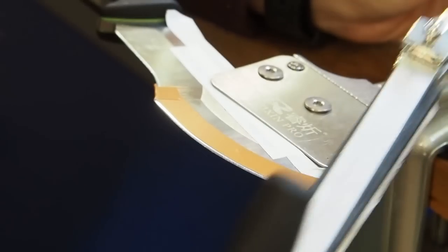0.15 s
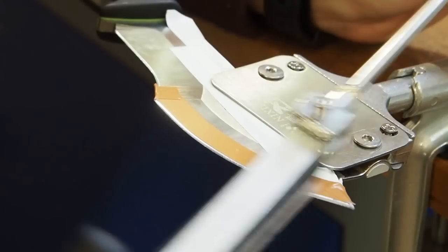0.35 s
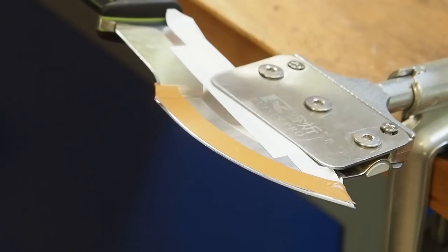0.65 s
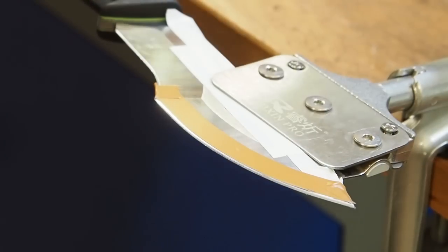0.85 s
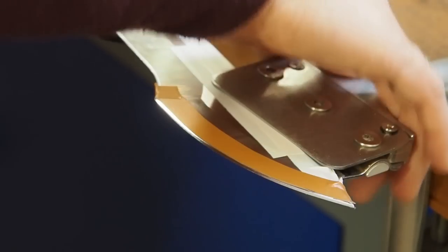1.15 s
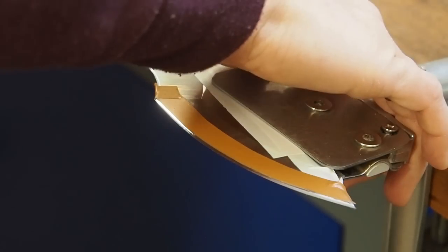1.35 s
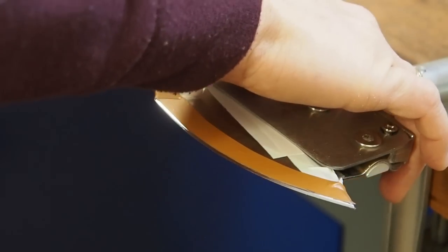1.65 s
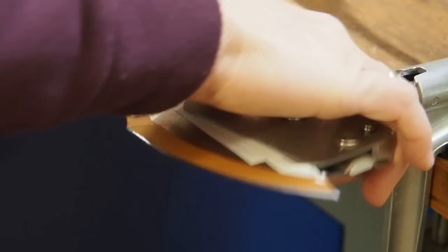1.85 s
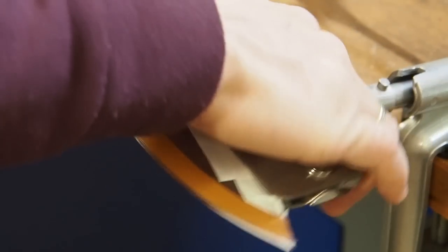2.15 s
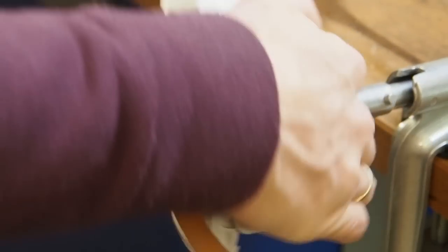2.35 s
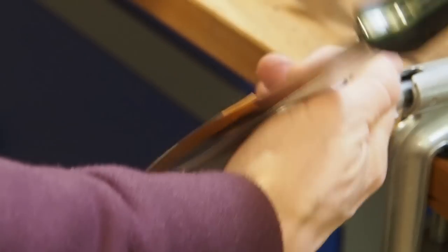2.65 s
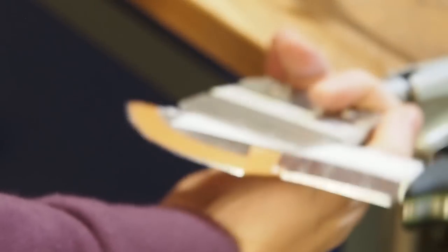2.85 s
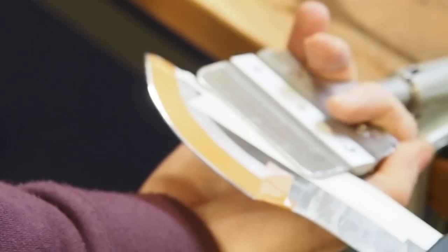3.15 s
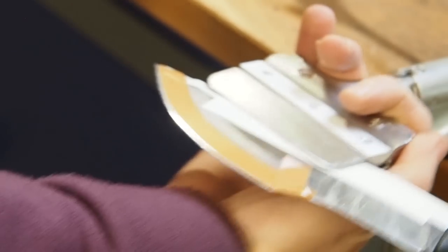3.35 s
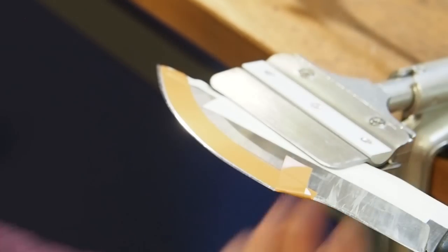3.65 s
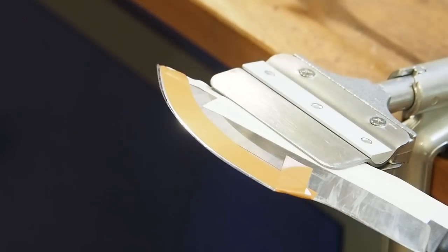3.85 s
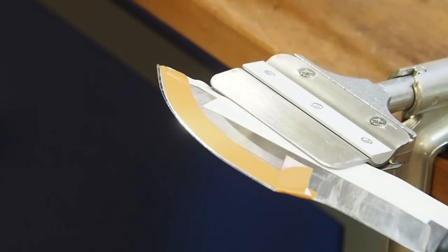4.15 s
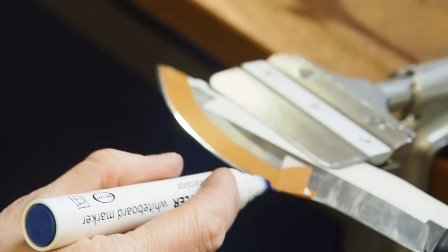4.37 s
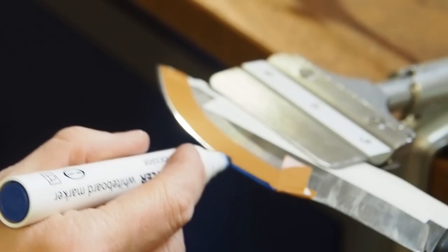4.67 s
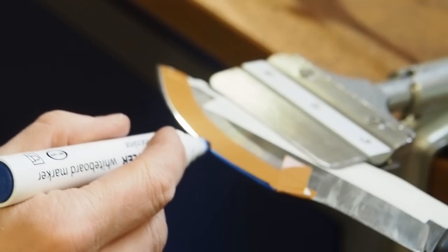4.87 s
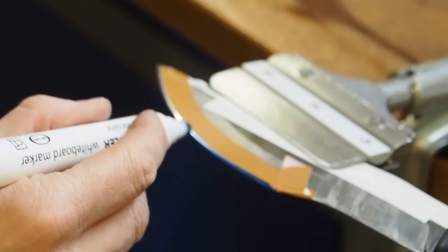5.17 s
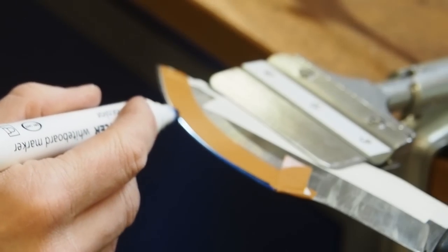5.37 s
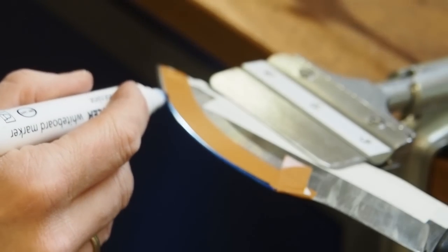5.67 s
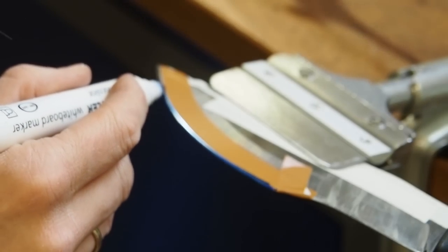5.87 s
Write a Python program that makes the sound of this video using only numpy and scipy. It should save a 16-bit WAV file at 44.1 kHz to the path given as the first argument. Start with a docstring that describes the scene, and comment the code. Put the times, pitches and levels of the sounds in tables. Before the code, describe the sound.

Close metal handling at a bench: short sliding hiss, sharp latch clack, dense juddering clatter, a pause, seating knocks and a tick, then soft marker rubbing.

```python
"""Quiet workshop, wooden bench: a knife held in a steel sharpening jig. The stone holder slides off on its
rod, the clamp unlocks with a snap, judders and grinds as it is pulled out and turned over, then knocks home;
a felt tip is drawn along the edge. Contact forces and noisy friction drive resonant filters for steel, plates,
jaws, arm and bench; blows ring as damped sines, the rod hisses and squeaks, the felt tip hisses.
Behind: a short room tail, steady air noise and a thin whine."""
import sys
import numpy as np
from scipy import signal
from scipy.fft import rfft, irfft, next_fast_len
from scipy.io import wavfile

SR = 44100
rng = np.random.default_rng(int(sys.argv[2]) if len(sys.argv) > 2 else 0)


def master(y):
    """Save y as 16-bit WAV."""
    cut = np.clip(np.atleast_2d(y).T, -1, 1)
    pcm = np.round(cut * 32767)  # scale
    wavfile.write(sys.argv[1], SR, pcm.astype(np.int16))


N = 265460
FFT_SIZE = next_fast_len(N + SR)
HZ = np.maximum(np.arange(FFT_SIZE // 2 + 1) * SR / FFT_SIZE, 1)
BODY_GRID = 2 ** 15

# Knocks and slips in the jig, then latch and pin snapping metal on metal, then slow scuffs of the clamp pushed
# towards its seat. Each row: start in seconds, force on the jaws in dB, steel crack against it in dB,
# jolt into the bench in relative dB.
KNOCKS = [(0.6477, -54.5, -12, -51), (0.7763, -56, 4, -61), (0.858, -49.5, 1, -60), (0.9184, -50, 9, -69),
          (1.3666, -37.5, 3.5, -43), (1.3976, -38, 0, -31.5), (1.4326, -33.5, 3, -36),
          (1.4654, -36.5, 8.5, -28.5), (1.499, -29.5, -1.5, -31), (1.5342, -30, 2, -27),
          (1.564, -40, 7, -33), (1.5823, -32.5, 5, -29), (1.614, -36.5, 10, -32), (1.6391, -35.5, 5.5, -45),
          (1.6631, -32.5, 2.5, -27), (1.75, -56, 17, -32), (1.799, -36, 1, -29.5),
          (1.8283, -33.5, 0.5, -23.5), (1.857, -43, 13, -26.5), (1.894, -36.5, 5.5, -29),
          (1.9344, -34, 8, -32), (1.9698, -39.5, 7, -31), (2.0145, -32.5, 3.5, -26.5),
          (2.064, -35.5, -1.5, -32), (2.0755, -31, -0.5, -28), (2.2214, -48, -20, -51),
          (3.1193, -29.5, -19, -41), (3.1359, -35, -2, -23), (3.158, -41.5, -5, -43),
          (3.4137, -29, 3.5, -22), (3.4496, -44, -15, -32.5), (3.4754, -45.5, -2, -41),
          (3.578, -58, -2, -47), (3.7193, -40, -4.5, -41), (3.801, -40, -33, -43), (3.8883, -50.5, -5, -54),
          (3.9378, -50.5, -6, -59), (4.328, -69, 14.5, -60)]
SNAPS = [(1.2858, -18, -8, -35), (3.7713, -37.5, -2.5, -52)]
SHOVES = [(3.08, -51, -14, -47), (3.1, -44, -8, -25), (3.35, -56, -8, -44), (3.375, -34.5, -8, -22)]
# Low thuds in the bench, alone or under a knock. Each row: start in seconds, bench top in relative dB,
# sway against it in dB.
THUDS = [(0.858, -39.5, -27), (1.197, -45, -27), (2.2587, -41.5, -3), (2.3819, -39, -30), (2.9301, -45, -8),
         (3.415, -37, -23), (3.7215, -42.5, -17), (5.6585, -53.5, 3)]
# Nominal rise and decay, scaled per part in contacts(). Shares in dB: plates and arm against the jaws,
# sway against the bench top.
KNOCK_RISE_S, KNOCK_T60_S, KNOCK_SHARES_DB = 0.004, 0.049, (-11.5, -1.5, -7)
SNAP_RISE_S, SNAP_T60_S, SNAP_SHARES_DB = 0.0012, 0.072, (-2.5, -7, -23)
SHOVE_RISE_S, SHOVE_T60_S, SHOVE_SHARES_DB = 0.008, 0.146, (-10, -3.5, -4)
THUD_RISE_S, THUD_T60_S = 0.0036, 0.087
HOLD_IN_RISES = 2.5   # decay starts this many nominal rise times after onset
PLATES_FOLLOW_STEEL = 0.32   # share of the steel's dB that the plates take up

# Rubbing of shaft and hands, one list per movement. Each row: time in seconds, pressure on the jaws in relative
# dB, steel grind against it in dB, rumble into the bench in relative dB.
RUBS = [
    [(0.0, -72, -29, -63), (0.162, -58.5, 19, -58), (0.296, -51, -6, -50.5), (0.42, -62.5, 1.5, -60),
     (0.55, -63.5, 15, -69), (0.69, -61.5, 6, -60), (0.858, -62.5, 5, -60.5), (1.124, -57.5, -18, -68),
     (1.27, -66, 2, -61)],
    [(1.3, -53, -8, -44), (1.338, -34.5, -18, -40), (1.458, -38.5, 0, -33.5), (1.52, -38, -3, -35.5),
     (1.64, -40, 1, -36), (1.73, -47.5, -3, -39.5), (1.806, -43.5, 2, -38), (1.97, -37.5, -4, -32),
     (2.11, -46.5, -6, -47), (2.25, -71, -9, -60), (2.6, -61.5, -16, -56.5)],
    [(3.0, -74, -13, -65), (3.172, -48, -8, -45.5), (3.304, -72, -8, -55), (3.364, -52, -22, -48.5),
     (3.464, -50, -17, -47.5), (3.55, -80, -28, -52), (3.742, -63, 17.5, -66), (3.858, -56.5, -9, -57),
     (3.962, -71.5, 9, -72), (4.2, -73, 11, -72)],
]
RUB_SHARES_DB = (-4, -0.5, -3)   # as for the knocks

# Broad colours of the jig parts and the bench. Each row: frequency in Hz, relative density in dB per Hz.
STEEL_COLOUR = [(2350, -33.5), (4000, -2.5), (4360, 1), (6550, -1), (7480, 3), (9280, 2.5), (10500, -3),
                (12100, -2.5), (16000, -17.5)]
PLATE_COLOUR = [(1500, -55), (2200, 4), (2600, 0), (3600, 0), (4600, -4.5), (5500, -15), (8000, -21.5)]
JAW_COLOUR = [(500, -30.5), (900, -2), (1100, 2), (1900, -1.5), (2300, -5.5), (3500, -34)]
ARM_COLOUR = [(200, -29), (320, 3), (560, -6.5), (700, 0), (900, -4.5), (1200, -28.5), (2000, -31.5)]
TOP_COLOUR = [(60, -33.5), (120, -6), (170, -1), (250, -2.5), (330, -23), (600, -39.5)]
SWAY_COLOUR = [(20, -33), (45, -17.5), (85, 2.5), (115, -10), (170, -43)]
# Their resonances. Each row: frequency in Hz, width in Hz, power in dB against the broad colour.
STEEL_MODES = [(4340, 110, -5.5), (5580, 100, 2), (7470, 200, 1), (8430, 100, 3.5), (9000, 74, 5),
               (11950, 200, -4)]
PLATE_MODES = [(2485, 98, 5.8), (2740, 23, 2.7), (3240, 68, 5.1), (3390, 50, 3.2), (3400, 38, 1.9),
               (4160, 91, 2.1), (4890, 100, 2.8)]
JAW_MODES = [(1030, 24, 3.9), (1126, 15, 5.5), (1414, 54, 5.1), (1664, 107, 10.2), (1840, 60, 3.8),
             (1958, 78, 5.9)]
ARM_MODES = [(375, 105, 2.9), (473, 41, 8.5), (632, 51, 9.5), (744, 11, 1.3), (817, 29, 7.6),
             (878, 27, 5.9)]
TOP_MODES = [(149.2, 18.3, 12.3), (169.4, 14, 9.3), (218, 50, 5.9), (219, 25, 2.6)]
SWAY_MODES = [(73.4, 20, 2.8), (91.6, 12, 22)]
# The turned clamp shows the listener its other face. Each row: frequency in Hz, change in dB.
TURNED_S = 2.75
TURNED_COLOUR = [(60, 0), (100, -4), (150, -3.5), (220, 6.5), (290, 4.5), (400, -2), (850, 2), (1450, -0.5),
                 (1670, -3.5), (1900, 0), (2300, 1.5), (4500, 1), (7000, -3), (12000, -5)]

# Blows that ring clear: start in seconds, level in dB, chatter decay t60 in seconds.
LATCH_BLOW = (1.287, -22, 0.02)
TICK_BLOW = (3.772, -33.5, 0.034)
CHINK_BLOW = (1.068, -42, 0.04)
# Modes the blows set ringing. Each row: frequency in Hz, relative level in dB, decay t60 in seconds.
LATCH_MODES = [(162, -11, 0.33), (476, -22, 0.119), (657, -5, 0.18), (736, -8, 0.18), (816, -8.5, 0.17),
               (887, -20, 0.093), (1008, 0, 0.11), (1068, -2, 0.09), (1087, -10.5, 0.091), (1410, -5, .08),
               (1586, -5, .07), (1740, -7, 0.072), (1990, 2.5, 0.052), (2573, -16, .07), (2790, -5, 0.04),
               (3050, -13, .05), (3510, -8.5, 0.054), (3990, -15, 0.035)]
TICK_MODES = [(787, -5.5, 0.15), (974, -7.5, 0.08), (1740, -2, 0.15), (1800, -3, 0.1), (2166, -3, 0.05),
              (2955, -7, 0.08), (3400, -11, 0.022), (3700, -8, 0.028), (4770, -17, .04)]
CHINK_MODES = [(1430, -4, 0.1), (1490, -6, 0.08), (4730, -6, .05)]
CHATTER_DB = -9   # later touches of a blow against the first, before their decay

# Slips and blows ringing one patch of steel. Each row: start in seconds, rms of the first 10 ms in dB,
# pitch in Hz.
PINGS = [(1.288, -29, 3000), (1.296, -34.5, 4200), (1.367, -42, 7500), (1.434, -35, 7600),
         (1.466, -38, 11500), (1.469, -32, 7450), (1.499, -35, 7500), (1.536, -32, 7300),
         (1.565, -43, 7500), (1.583, -36, 4430), (1.583, -29, 9300), (1.585, -38, 12000),
         (1.615, -41, 4330), (1.617, -35, 8000), (1.64, -34, 9400), (1.664, -40, 8800), (1.668, -39, 4550),
         (1.804, -36, 5660), (1.858, -35.5, 5460), (1.858, -43, 8800), (1.895, -35.5, 2600),
         (1.935, -39, 9500), (1.935, -33, 12100), (1.937, -37, 5350), (1.967, -39, 4600),
         (2.015, -37, 9000), (2.015, -40, 12200), (2.065, -41, 4600), (2.078, -39, 4550),
         (3.121, -31, 1700), (3.135, -37.5, 4570), (3.136, -45, 8140), (3.378, -49, 4400),
         (3.386, -37, 2050), (3.414, -29.5, 4470), (3.418, -36, 8300), (3.422, -35, 2300),
         (3.7205, -44, 1700), (3.721, -43, 550), (3.771, -41.5, 3400), (3.772, -47, 2370),
         (3.801, -54, 3370)]
PING_WIDTH, PING_TOUCHES_PER_S = 0.11, 1300   # width as a share of the pitch
PING_HOLD_S, PING_T60_S = 0.006, 0.043   # chatter before its decay, then the decay
PING_FIRST, PING_OWN = 1.2, 0.57   # first touch against later ones, gain of touches heard on one side only

# Brief shaft squeals as load comes on. Each row: start in seconds, length in seconds, level in dB.
SQUEALS = [(1.265, .025, -55), (3.078, 0.025, -48), (3.346, .05, -47.5)]
SQUEAL_HZ, SQUEAL_FLUTTER_HZ = 1660, 40

# Guide rod sliding in its bush, one list per slide. Each row: time in seconds, level in dB, squeak in Hz,
# squeak against the hiss in dB.
ROD_SLIDES = [
    [(0.05, -79, 1700, -6), (0.094, -70, 1750, 3), (0.136, -47.5, 1720, -2), (0.18, -44.5, 1620, -10),
     (0.235, -39.5, 1700, -15), (0.262, -37, 981, -5), (0.305, -39, 1024, -3), (0.32, -34, 2043, -5),
     (0.335, -37.5, 1667, -4.5), (0.406, -45, 1424, -7.5), (0.476, -74, 1435, -8)],
    [(0.84, -71, 1100, -4), (0.876, -47, 1185, 2), (0.895, -44, 1390, -12), (0.915, -41, 1610, -4.5),
     (0.938, -46.5, 2004, 4), (0.97, -54.5, 1965, -3), (1.02, -65, 1810, -4)],
    [(1.03, -68, 2350, 1), (1.058, -52, 2400, 9), (1.068, -48, 1635, 4.5), (1.08, -50, 1450, 7),
     (1.12, -65, 1470, 4), (1.17, -71, 1500, 3.5)],
]
# Hiss colour of the rod. Each row: frequency in Hz, relative density in dB per Hz.
ROD_COLOUR = [(350, -31), (600, -11), (717, -15), (845, -7.5), (1130, -11.5), (1670, -3), (4550, -10.5),
              (5140, -11.5), (6670, -10.5), (8420, -6.5), (15800, -20.5)]
# Rod resonances. Each row: frequency in Hz, width in Hz, power in dB against the broad colour.
ROD_MODES = [(860, 35, 2.8), (1027, 43, 5.5), (1300, 35, 2.9), (1703, 40, 1), (2540, 31, 2),
             (2695, 36, 2.6), (4950, 140, 4.3), (5270, 150, 5.8), (8000, 94, 3.1)]

# Felt tip pressed along the edge. Each row: time in seconds, level in dB.
FELT = [(4.38, -80), (4.5, -59), (4.57, -68), (4.65, -60.5), (4.71, -65), (4.77, -59), (4.86, -65),
        (5.09, -71), (5.35, -76.5), (5.5, -82)]
# Felt hiss colour. Each row: frequency in Hz, relative density in dB per Hz.
FELT_COLOUR = [(2500, -40), (3800, -12.5), (4600, -10), (5400, 0), (6400, -10), (7600, -1.5), (8600, -17),
               (10000, -29)]

# Left side against right. Each row: frequency in Hz, gain in dB.
LEFT_COLOUR = [(100, 1.5), (6000, -1), (9000, -1.5), (13000, -9)]
LEFT_LAG_S = 0.000055
# Room decay. Each row: frequency in Hz, t60 in seconds.
ROOM = [(60, 0.46), (500, 0.42), (2000, 0.27), (8000, 0.22), (15000, 0.087)]

# Air noise colour. Each row: frequency in Hz, relative density in dB per Hz.
AIR_COLOUR = [(15, -54), (25, -12.5), (74, -3.5), (170, -8), (200, -6.5), (277, -20), (354, -8),
              (575, -21.5), (714, -15.5), (1190, -21.5), (1330, -21), (2990, -28), (5000, -32.5),
              (11600, -34.5), (16000, -39)]
# Broad peaks on it. Each row: frequency in Hz, width in Hz, power in dB against the broad colour.
AIR_PEAKS = [(5070, 640, 3), (8220, 630, 5.5), (12500, 880, 0)]
# Left-right likeness of the air noise. Each row: frequency in Hz, correlation (negative is taken as 0).
AIR_ALIKE = [(60, 0.14), (180, 0.4), (550, 0.27), (1650, 0.18), (4970, -0.16), (15000, -0.01)]
AIR_RMS_DB = -56.5
# Steady whine. Each row: multiple of WHINE_HZ, rms in dB.
WHINE = [(3, -91), (5, -86), (6, -89), (7, -85), (8, -87), (9, -92)]
WHINE_HZ = 1608.5
CUTOFF_HZ = 15850


def jig():
    """Contacts excite metal parts as rattling grit; the bench takes knocks as jolts and rubbing as rumble."""
    rub = rub_force() * amp(2.0 * drift(30.5) - 2.5)
    knocks = knock_force()
    steel, plates, jaws, arm = np.hypot(rub, knocks)[:4]
    top, sway = rub[4:] * rng.standard_normal((2, N)) + bench_jolts(knocks[4:])
    sound = through(steel * scattered(9000, 5.4, alike=0.59), body(STEEL_COLOUR, STEEL_MODES))
    sound = sound + through(plates * scattered(3500, 4.7, alike=0.63), body(PLATE_COLOUR, PLATE_MODES))
    sound = sound + through(jaws * scattered(6000, 3.0, alike=0.92), body(JAW_COLOUR, JAW_MODES))
    sound = sound + through(arm * grit(6000, 2.55), body(ARM_COLOUR, ARM_MODES))
    sound = sound + through(top, body(TOP_COLOUR, TOP_MODES))
    sound = sound + through(sway, body(SWAY_COLOUR, SWAY_MODES))
    turned = np.arange(N) > TURNED_S * SR
    sound = sound * ~turned + through(sound * turned, amp(at_hz(TURNED_COLOUR)))
    return sound + blow(LATCH_BLOW, LATCH_MODES) + blow(TICK_BLOW, TICK_MODES) + blow(CHINK_BLOW, CHINK_MODES)


def bench_jolts(force):
    """The wood answers to the change of force, cushioned by the clamp foot (one-pole low-pass, 140 Hz)."""
    change = np.diff(force, prepend=0) * amp([[33], [30]])   # top, sway
    soft = np.exp(-2 * np.pi * 140 / SR)
    return signal.lfilter([1 - soft], [1, -soft], change)


def rub_force():
    """Rubbing pressure on the six parts, silent between the movements."""
    force, t = 0, np.arange(N) / SR
    for rows in RUBS:
        s, *columns = np.transpose(rows)
        levels_db = [np.interp(t, s, column) for column in columns]
        moving = (t >= s[0]) * (t <= s[-1])
        force = force + on_parts(*levels_db, RUB_SHARES_DB) * moving
    return force


def knock_force():
    """Force of all knocks, snaps, shoves and thuds on the six parts."""
    kinds = [(KNOCKS, KNOCK_RISE_S, KNOCK_T60_S, KNOCK_SHARES_DB),
             (SNAPS, SNAP_RISE_S, SNAP_T60_S, SNAP_SHARES_DB),
             (SHOVES, SHOVE_RISE_S, SHOVE_T60_S, SHOVE_SHARES_DB)]
    force = 0
    for rows, rise_s, t60_s, shares_db in kinds:
        events = [(s, on_parts(*levels_db, shares_db)) for s, *levels_db in rows]
        force = force + contacts(events, rise_s, t60_s)
    # thuds reach the bench only
    thuds = [(s, np.append(np.zeros(4), amp([db, db + sway_db]))) for s, db, sway_db in THUDS]
    return force + contacts(thuds, THUD_RISE_S, THUD_T60_S)


def on_parts(jaws_db, steel_db, bench_db, shares_db):
    """Gains on steel, plates, jaws, arm, bench top and sway from one contact."""
    plates_db, arm_db, sway_db = shares_db
    return amp([jaws_db + steel_db,
                jaws_db + plates_db + PLATES_FOLLOW_STEEL * steel_db,
                jaws_db,
                jaws_db + arm_db,
                bench_db,
                bench_db + sway_db])


def contacts(events, rise_s, t60_s):
    """Each contact (start in seconds, gains on the six parts) rises, slides on, then dies out."""
    force, t = np.zeros((6, N + SR)), np.arange(SR // 3) / SR
    # factors for steel, plates, jaws, arm, top, sway: hard parts answer first
    part_rise_s = rise_s * np.array([[.4], [.6], [.9], [1.1], [1.05], [1.05]])
    part_t60_s = t60_s * np.array([[.9], [1.05], [1.1], [1.15], [.6], [.8]])
    decay = amp(-60 * np.maximum(t - HOLD_IN_RISES * rise_s, 0) / part_t60_s)
    shape = np.minimum(t / part_rise_s, 1) * decay
    for s, levels in events:
        start = round(s * SR)
        force[:, start:start + len(t)] += levels[:, None] * shape
    return force[:, :N]


def blow(at, modes):
    """A blow and its brief chatter set every mode ringing as a damped sine."""
    s, level_db, chatter_t60_s = at
    t = np.arange(SR // 2) / SR
    ring = sum(amp(db - 60 * t / t60) * np.sin(2 * np.pi * hz * t) for hz, db, t60 in modes)
    touches = rng.choice([-1, 1], len(t)) * (rng.random(len(t)) < 1500 / SR)   # 1500 per second
    touches = touches * amp(CHATTER_DB - 60 * t / chatter_t60_s)
    touches[0] = 1
    touches /= np.sqrt(np.sum(touches ** 2))   # the touches share the energy of the blow
    out, start = np.zeros(N + SR), round(s * SR)
    out[start:start + 2 * len(t) - 1] = amp(level_db) * signal.fftconvolve(touches, ring)
    return out[:N]


def pings():
    """A first touch and dying chatter excite one resonance; each side catches some touches of its own."""
    out, t = np.zeros((2, N + SR)), np.arange(SR // 8) / SR
    size = (len(PINGS), 3, len(t))   # shared, left, right
    chatter = rng.standard_normal(size) * (rng.random(size) < PING_TOUCHES_PER_S / SR)
    chatter[:, 0, 0] = PING_FIRST
    decay = amp(-60 * np.maximum(t - PING_HOLD_S, 0) / PING_T60_S)
    chatter = (chatter[:, :1] + PING_OWN * chatter[:, 1:]) * decay
    for (s, db, hz), touches in zip(PINGS, chatter):
        r = np.exp(-np.pi * PING_WIDTH * hz / SR)
        rung = signal.lfilter([1, 0, -1], [1, -2 * r * np.cos(2 * np.pi * hz / SR), r * r], touches)
        start = round(s * SR)
        first_rms = np.sqrt(np.mean(rung[:, :SR // 100] ** 2))
        out[:, start:start + len(t)] += amp(db) * rung / first_rms
    return out[:, :N]


def squeal():
    """Stick-slip on the shaft: half-sine swells of one tone with a fluttering level."""
    t = np.arange(N) / SR
    swell = sum(amp(db) * np.sin(np.pi * np.clip((t - s) / length_s, 0, 1)) for s, length_s, db in SQUEALS)
    return swell * (1 + .4 * drift(SQUEAL_FLUTTER_HZ)) * np.sin(2 * np.pi * SQUEAL_HZ * t)


def rod():
    """Sliding friction: grit hisses in the rod's resonances beside a rough stick-slip squeak of moving pitch."""
    hiss, squeak, t = np.zeros(N), np.zeros(N), np.arange(N) / SR
    for rows in ROD_SLIDES:
        s, _, hz, squeak_db = np.transpose(rows)
        level = gains(rows)[0]
        phase = 2 * np.pi * np.cumsum(np.interp(t, s, hz)) / SR
        hiss += level
        squeak += level * amp(np.interp(t, s, squeak_db)) * np.sin(phase)
    rough = drift(140)   # the stick-slip keeps breaking off, which widens the line
    catches = hiss * amp(1.85 * drift(27)) * scattered(7000, 2.5, alike=0.61)
    return through(catches, body(ROD_COLOUR, ROD_MODES)) + squeak * rough


def felt_tip():
    """Fibres catch on the bevel: dense grit with a wandering level, filtered to a fine hiss."""
    catches = gains(FELT)[0] * amp(1.5 * drift(30)) * grit(8000, 3.2)
    return through(catches, body(FELT_COLOUR))


def workshop(x):
    """Room tail: ten feedback delays a side, each losing what the walls absorb at every frequency."""
    delays_s = rng.uniform(.008, .032, (2, 10, 1))
    loop = amp(-60 * delays_s / at_hz(ROOM)) * np.exp(-2j * np.pi * HZ * delays_s)
    signs = (-1) ** np.arange(10)[:, None]
    left, right = (signs * loop / (1 - loop)).sum(axis=1)
    shared = np.clip(350 / HZ, 0, 1)   # long waves reach both sides alike
    return through(x, np.array([left, shared * left + np.sqrt(1 - shared ** 2) * right]))


def air():
    """Steady coloured stereo noise, partly alike left and right, with a thin whine of steady sines."""
    alike = np.clip(at_hz(AIR_ALIKE), 0, 1)
    mid, side = rfft(rng.standard_normal((2, FFT_SIZE)))
    both = np.sqrt(1 + alike) * mid + np.sqrt(1 - alike) * side * [[1], [-1]]
    noise = rms_one(irfft(both * body(AIR_COLOUR, AIR_PEAKS), FFT_SIZE)[:, :N])
    whine, t = np.zeros(N), np.arange(N) / SR
    for multiple, db in WHINE:
        cycles = multiple * WHINE_HZ * t + rng.random()
        whine += amp(db) * np.sqrt(2) * np.sin(2 * np.pi * cycles)
    return amp(AIR_RMS_DB) * noise + whine


def amp(db):
    """dB to gain."""
    return 10 ** (np.asarray(db) / 20)


def rms_one(x):
    """Scale to rms 1."""
    return x / np.sqrt(np.mean(x ** 2))


def at_hz(points, hz=HZ):
    """Interpolate a table on a log-frequency axis."""
    points_hz, values = np.array(points).T
    return np.interp(np.log(hz), np.log(points_hz), values)


def gains(rows):
    """dB columns of a time table as gains per sample, -120 dB outside it."""
    s, *columns = np.transpose(rows)
    t = np.arange(N) / SR
    return np.array([amp(np.interp(t, s, column, -120, -120)) for column in columns])


def drift(rate_hz):
    """Random wander: Gaussian noise through two low-pass poles at rate_hz, rms 1 about zero."""
    r = np.exp(-2 * np.pi * rate_hz / SR)
    wander = signal.lfilter([1], [1, -2 * r, r * r], rng.standard_normal(N + SR))
    return rms_one(wander[SR:])


def through(x, response):
    """Filter by a frequency response."""
    return irfft(rfft(x, FFT_SIZE) * response, FFT_SIZE)[..., :N]


def body(colour, modes=()):
    """Causal (minimum-phase) response: broad colour with resonances on it, unit power gain."""
    grid_hz = np.maximum(np.arange(BODY_GRID // 2 + 1) * SR / BODY_GRID, 1)
    power = 1 + sum(amp(2 * db) / (1 + (2 * (grid_hz - hz) / width) ** 2) for hz, width, db in modes)
    magnitude = amp(np.maximum(at_hz(colour, grid_hz), -70)) * np.sqrt(power)
    # folding the cepstrum gives the minimum phase
    cepstrum = irfft(np.log(magnitude))
    cepstrum[1:BODY_GRID // 2] *= 2
    cepstrum[BODY_GRID // 2 + 1:] = 0
    impulse = irfft(np.exp(rfft(cepstrum)))
    return rfft(impulse, FFT_SIZE) / np.sqrt(np.mean(magnitude ** 2))


def grit(per_s, spread_db):
    """Dense clicks of uneven size where two rough faces catch; rms 1."""
    at = np.flatnonzero(rng.random(N) < per_s / SR)
    sizes_db = spread_db * np.minimum(rng.exponential(1, len(at)), 4)
    out = np.zeros(N)
    out[at] = amp(sizes_db) * rng.choice([-1, 1], len(at))
    return rms_one(out)


def scattered(per_s, spread_db, alike):
    """Grit from a wide part: each side hears the same catches plus some of its own."""
    shared = grit(per_s, spread_db)
    own = np.array([grit(per_s, spread_db), grit(per_s, spread_db)])
    return np.sqrt(alike) * shared + np.sqrt(1 - alike) * own


def scene():
    """The jig is nearer the right: the left hears it later and duller; room tail and air are added."""
    near = jig() + pings() + rod() + felt_tip() + squeal()
    left = amp(at_hz(LEFT_COLOUR)) * np.exp(-2j * np.pi * HZ * LEFT_LAG_S)
    sides = np.array([left, np.ones(len(HZ))])
    return amp(-1.0) * through(near, sides) + amp(-15.5) * workshop(near) + air()


def record(dry):
    """Steep elliptic low-pass at CUTOFF_HZ."""
    return signal.sosfilt(signal.ellip(12, .3, 60, CUTOFF_HZ, fs=SR, output="sos"), dry)


dry = scene()
out = record(dry)
master(out)
```